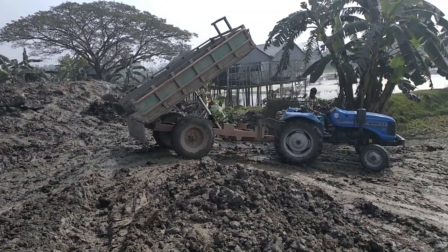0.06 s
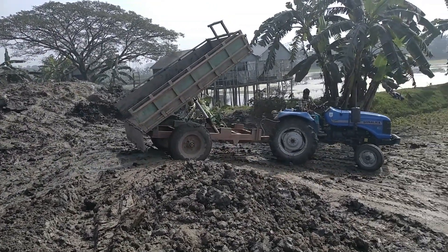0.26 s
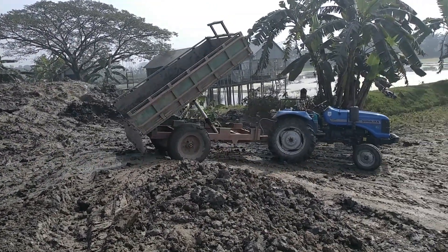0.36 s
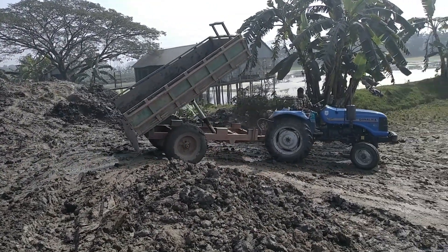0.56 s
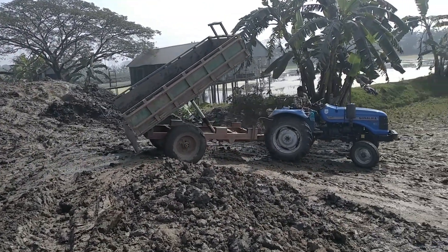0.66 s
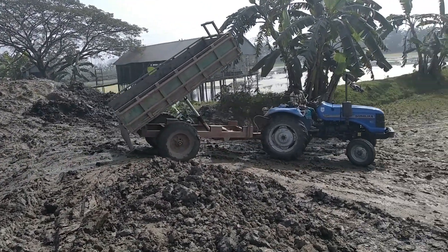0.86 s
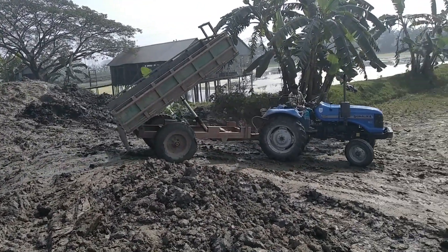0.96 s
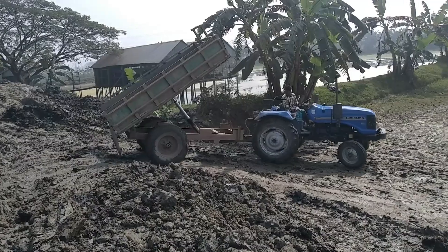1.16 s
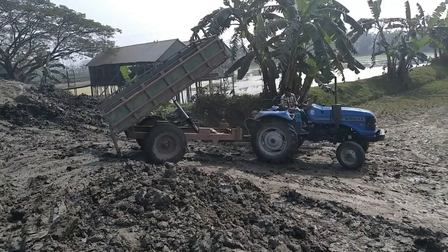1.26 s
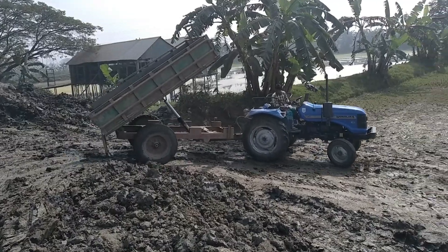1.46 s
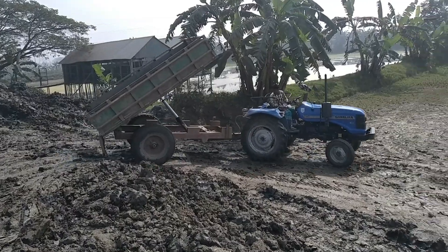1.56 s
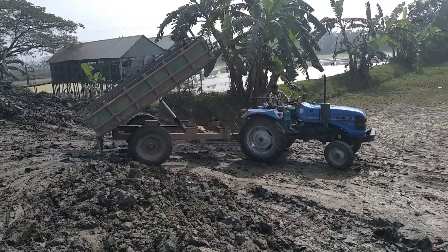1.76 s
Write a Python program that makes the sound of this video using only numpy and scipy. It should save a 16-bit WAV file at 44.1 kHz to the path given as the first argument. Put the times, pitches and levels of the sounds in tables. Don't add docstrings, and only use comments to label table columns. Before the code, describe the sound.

A diesel tractor thuds unevenly as its empty raised steel trailer scrapes, clanks and booms over ruts

```python
import sys
import numpy as np
from scipy import signal
from scipy.fft import rfft, irfft, next_fast_len
from scipy.io import wavfile
from scipy.ndimage import uniform_filter1d

SR = 44100
rng = np.random.default_rng(int(sys.argv[2]) if len(sys.argv) > 2 else 0)


def inscribe(sig):
    pcm = np.round(np.clip(np.atleast_2d(sig).T, -1, 1) * 32767)
    wavfile.write(sys.argv[1], SR, pcm.astype(np.int16))


def makeup_ratio(level_db):
    decades = np.asarray(level_db, float) / 20
    return 10 ** decades


N = 79380
T = np.arange(N) / SR


def unit(x):
    return x / np.sqrt(np.mean(x ** 2) + 1e-20)


def along(points, hz, axis=1):
    columns = np.transpose(points)
    return np.interp(np.log(hz + 1), np.log(columns[0] + 1), columns[axis])


def curves(rows):
    start_s, *columns = np.transpose(rows)
    return [np.interp(T, start_s, column) for column in columns]


def filtered(x, response):
    size = next_fast_len(N + SR // 2)
    spectrum = rfft(x, size) * response(np.fft.rfftfreq(size, 1 / SR))
    return irfft(spectrum, size)[..., :N]


def coloured_noise(colour):
    return unit(filtered(rng.standard_normal(N), lambda f: makeup_ratio(along(colour, f))))


def body(peaks):
    def response(f):
        total = 0
        for k, (pitch, width, db) in enumerate(peaks):
            damping = 1j * f * width
            total = total + (-1) ** k * makeup_ratio(db) * damping / (pitch * pitch - f * f + damping)
        return total
    return response


def grains(per_s, spread_db):
    hit = rng.random(N) < per_s / SR
    sign = np.sign(rng.standard_normal(N))
    return unit(hit * sign * makeup_ratio(spread_db * rng.standard_normal(N).clip(-2, 2)))


def shape(s, rise, hold, t60):
    fall_time = np.clip(T - s - rise - hold, 0, 1)
    return np.clip((T - s) / rise, 0, 1) ** 2 * makeup_ratio(-60 * fall_time / t60)


# (pitch_hz, fade_by_60_db_s, level_db)
YARD_ECHO = [(99, 0.22, -18.5), (635, 0.051, -10), (3130, 0.031, -1), (9700, 0.019, -0.5)]


def yard(x):
    out, step = np.zeros((2, N + SR)), SR // 20
    for start in range(0, N, step):
        hz, t, z = signal.stft(rng.standard_normal((2, SR // 8)), SR, nperseg=256)
        fade_s = along(YARD_ECHO, hz)[:, None]
        tail = signal.istft(z * makeup_ratio(-60 * t / fade_s) / np.sqrt(fade_s), SR, nperseg=256)[1]
        wet = signal.fftconvolve(x[None, start:start + step], tail / np.linalg.norm(tail[0]), axes=1)
        out[:, start:start + wet.shape[1]] += wet
    return filtered(out[:, :N], lambda f: makeup_ratio(along(YARD_ECHO, f, axis=2)))


# (start_s, firings_per_s)
ENGINE_SPEED = [
    (0, 39.2),
    (.45, 35.3),
    (.65, 56.7),
    (1, 57),
    (1.35, 48),
    (1.8, 51.2),
]


def firings():
    jitter, scatter_db, pressure_s = .08, 1, .021
    turn = np.cumsum(curves(ENGINE_SPEED)[0]) / SR
    draw = rng.standard_normal((int(turn[-1]) + 1, 2))
    k = np.arange(len(draw))
    at = np.searchsorted(turn, k + jitter * draw[:, 0]).clip(0, N - 1)
    cylinder_db = np.take([0, -3, -1.5], k % 3)
    fire = np.bincount(at, makeup_ratio(cylinder_db + scatter_db * draw[:, 1]), N)
    pressure = unit(signal.lfilter([1], [1, -np.exp(-1 / (pressure_s * SR))], fire))
    return fire, pressure


# (pitch_hz, level_db)
CLATTER_COLOUR = [(180, -16), (300, 6), (411, -10.5), (571, -5.5), (1350, -11), (2170, -9.5), (2400, -12),
                  (7880, -17), (15500, -43)]


def clatter(pressure, swing_db):
    level_db, follows, pulsing = -44, 0.16, 0.22
    return makeup_ratio(level_db + follows * swing_db) * coloured_noise(CLATTER_COLOUR) * (1 + pulsing * (pressure - 1))


# (pitch_hz, width_hz, level_db)
EXHAUST_PIPE = [(114.7, 44, 2), (153, 26, 6.5), (210, 90, 0), (278, 140, -4.5), (525, 132, -5)]


def exhaust(fire, pressure, swing_db):
    level_db, follows, puff_share = -38, 0.24, .55
    gas = pressure * rng.standard_normal(N)
    pulse, puff = filtered(np.array([fire, gas]), body(EXHAUST_PIPE))
    mix = np.sqrt(1 - puff_share) * unit(pulse) + np.sqrt(puff_share) * unit(puff)
    return makeup_ratio(level_db + follows * swing_db) * mix


def engine(shake_db):
    swing_db = shake_db - shake_db.mean()
    fire, pressure = firings()
    return exhaust(fire, pressure, swing_db) + clatter(pressure, swing_db)


# (pitch_hz, width_hz, level_db)
BED_DEEP = [(109, 53, -5), (160, 35.5, 2), (220, 40, -1), (288, 12, -3.5)]
BED_SHEETS = [(266.4, 37, -2.5), (421, 39, -8), (477.4, 12.7, 1), (585, 133, -2.5), (639, 114, 0),
              (930, 190, -10), (1950, 720, -20.5)]
KNOCKS_PER_S, KNOCK_SPREAD_DB = 600, 3


def bed(shake_db, bright_db):
    low = unit(filtered(grains(KNOCKS_PER_S, KNOCK_SPREAD_DB), body(BED_DEEP)))
    high = unit(filtered(grains(2 * KNOCKS_PER_S, KNOCK_SPREAD_DB), body(BED_SHEETS)))
    return makeup_ratio(shake_db) * (low + makeup_ratio(bright_db) * high) / np.sqrt(1 + makeup_ratio(2 * bright_db))


# (start_s, level_db, pitch_hz)
JOLTS = [(0.239, -29.5, 210), (0.325, -40, 160), (0.486, -35, 135), (.512, -37, 150), (.555, -28, 195),
         (.578, -33, 165), (0.608, -25, 218), (0.637, -29, 160), (.662, -33, 170), (.711, -31, 160),
         (.865, -34, 190), (0.943, -25.5, 112), (1.138, -25, 167.8), (1.329, -22, 145.2), (1.398, -29, 210),
         (1.522, -29.5, 156.5), (1.638, -30.5, 143.5), (1.744, -38.5, 125.6)]


def thumps():
    rise_s, hold_s, t60_s, overtone, overtone_db = .007, .007, .05, 1.7, -5
    out = np.zeros(N)
    for s, db, hz in JOLTS:
        angle = 2 * np.pi * hz * (T - s)
        note = np.sin(angle) + makeup_ratio(overtone_db) * np.sin(overtone * angle)
        out += makeup_ratio(db) * shape(s, rise_s, hold_s, t60_s) * note
    return out


# (pitch_hz, width_hz, level_db)
TAILGATE_PANEL = [(282, 30, 0.5), (453, 27, 0.5), (567, 29, 1.5), (652, 42, -0.5), (800, 155, -11)]
# (start_s, level_db, hold_s)
TAILGATE_GROANS = [
    (0.399, -22.5, 0.045),
    (1.057, -40.5, 0.049),
    (1.433, -38.5, 0.071),
]


def tailgate():
    rise_s, t60_s = .015, .05
    judder = unit(filtered(grains(KNOCKS_PER_S, KNOCK_SPREAD_DB), body(TAILGATE_PANEL)))
    return judder * sum(makeup_ratio(db) * shape(s, rise_s, hold, t60_s) for s, db, hold in TAILGATE_GROANS)


def squeak():
    start_s, rise_s, hold_s, glide_s = .452, .006, .009, .011
    t60_s, tail_t60_s, tail_db = .03, .16, -8
    level_db, octave_db, roughness, left_lag = -16, -30, .22, 1.4
    pitch = np.interp(T, [start_s, start_s + glide_s], [5050, 5358])
    phase = 2 * np.pi * np.cumsum(pitch) / SR - [[left_lag], [0]]
    flutter = 1 + roughness * unit(uniform_filter1d(rng.standard_normal(N), size=60))
    swell = shape(start_s, rise_s, hold_s, t60_s)
    swell = swell + makeup_ratio(tail_db) * shape(start_s, rise_s, hold_s, tail_t60_s)
    tone = np.sin(phase) + makeup_ratio(octave_db) * np.sin(2 * phase)
    return makeup_ratio(level_db) * swell * flutter * tone


# (start_s, level_db, ringing_pitch_hz, hold_s, ringing_over_broad_db)
STEEL_SCRAPES = [(0.11, -40, 1580, 0.063, 3), (0.228, -31, 5500, 0.0045, -2),
                 (0.238, -29, 6300, 0.002, 0.5), (0.344, -22.5, 6700, 0.034, -6),
                 (0.331, -29, 3580, 0.027, -23), (0.384, -37, 6760, 0.055, -3),
                 (0.484, -37, 4900, 0.047, -4), (0.561, -35.5, 6600, 0.038, -10),
                 (0.64, -44, 4100, 0.016, 1), (0.809, -38.5, 2560, 0.008, 2),
                 (0.85, -27.5, 4350, 0.0044, 6), (0.844, -25, 2120, 0.038, 7.5),
                 (0.887, -30.5, 4100, 0.021, -15), (0.916, -24.5, 2220, 0.016, 6.5),
                 (0.959, -27.5, 6140, 0.015, -19), (1, -27.5, 4070, 0.0084, -17),
                 (1.007, -24, 5850, 0.004, -1), (1.024, -26, 6260, 0.032, 3),
                 (1.285, -44, 6460, 0.0075, 45), (1.331, -52, 5970, 0.011, 23),
                 (1.357, -40.5, 7550, 0.0035, 3), (1.401, -35.5, 4430, 0.013, -27),
                 (1.43, -30.5, 4770, 0.023, -12), (1.489, -40, 4470, 0.028, -47),
                 (1.497, -49, 5430, 0.0067, 57)]
# (pitch_hz, level_db)
STEEL_COLOUR = [(530, -29), (900, 0.5), (1540, -7.5), (3460, 2), (5180, -1), (6820, -0.5), (9980, -11.5),
                (12800, -20.5), (15500, -54)]


def scrapes():
    contacts_per_s, spread_db, ring_width_hz = 5000, 1.5, 1650
    rise_s, t60_s, edge_t60_s, edge_hz, edge_db = .007, .14, .06, 8200, -0.5
    out = np.zeros(N)
    for s, db, hz, hold, ring_db in STEEL_SCRAPES:
        grit = grains(contacts_per_s, spread_db)
        ring = unit(filtered(grit, lambda f: body([(hz, ring_width_hz, 0)])(f) ** 2))
        broad = unit(filtered(grit, lambda f: makeup_ratio(along(STEEL_COLOUR, f))))
        bright = filtered(broad, lambda f: 1 / (1 + (edge_hz / (f + 1)) ** 8))
        slow = shape(s, rise_s, hold, t60_s) * (broad - bright + makeup_ratio(ring_db) * ring)
        fast = shape(s, rise_s / 2, hold, edge_t60_s) * makeup_ratio(edge_db) * bright
        out += makeup_ratio(db) * (slow + fast) / np.sqrt(1 + makeup_ratio(2 * ring_db))
    return out


# (start_s, level_db, pitch_hz, fade_by_60_db_s, crack_over_ring_db)
STRUCK_PINS = [(0.2321, -35.5, 5260, .03, 2), (0.2463, -24.5, 6540, 0.067, -13.5),
               (.3455, -27, 3670, .04, -1), (.352, -23, 6740, 0.039, 2), (0.8638, -22.5, 4410, 0.042, -11),
               (.930, -28, 2260, 0.049, -23), (0.9652, -24.5, 6100, 0.027, -3),
               (1.0227, -13, 6540, 0.049, -12), (1.035, -20.5, 6580, 0.098, -5),
               (1.056, -27, 6740, .07, -5.5), (1.3685, -30, 7670, 0.021, -3.5),
               (1.4042, -35.5, 4530, 0.019, -4), (1.4405, -22.5, 4480, .05, -8.5)]
# (pitch_hz, level_db)
CRACK_COLOUR = [(1500, -22), (3500, 0.5), (8000, 0), (12500, -7), (15300, -15)]


def pins():
    second_note, crack_db, crack_t60_s = 0.96, -2.1, 0.073
    out = np.zeros(N)
    for s, db, hz, t60, snap_db in STRUCK_PINS:
        angle = 2 * np.pi * hz * (T - s)
        pair = np.sin(angle) + 0.5 * np.sin(second_note * angle)
        ring = shape(s, 20 / SR, 0, t60) * pair
        crack = shape(s, 1 / SR, 0, crack_t60_s) * coloured_noise(CRACK_COLOUR)
        out += makeup_ratio(db) * (ring + makeup_ratio(crack_db + snap_db) * crack)
    return out


# (start_s, level_db, brightness_db)
TRAILER_SHAKE = [(0, -35.5, 2), (.11, -48.5, 2), (.32, -38.5, 2), (.385, -29, 10), (.462, -26.5, 6),
                 (.478, -40, -2), (.5, -27, -3.5), (.615, -26.5, 2), (.69, -32.5, -22), (.77, -62, 2),
                 (.85, -47.5, 72), (.868, -25, 0.5), (1.015, -31.5, 3), (1.17, -39, -4), (1.31, -46.5, 1),
                 (1.405, -34, -9.5), (1.545, -44, -1), (1.59, -58, 2)]


def scene():
    engine_left_db, engine_lead_s, squeak_yard_db = 9, 0.00026, -11
    half = np.array([[.5], [-.5]])
    shake_db, bright_db = curves(TRAILER_SHAKE)
    motor = engine(shake_db)
    trailer = bed(shake_db, bright_db) + thumps() + tailgate() + scrapes() + pins()
    dry_pin = squeak()
    lead = lambda f: np.exp(2j * np.pi * f * half * engine_lead_s)
    ahead = filtered(motor, lambda f: makeup_ratio(half * engine_left_db) * lead(f))
    direct = ahead + trailer + dry_pin
    return direct * makeup_ratio(-4.0) + yard(motor + trailer + makeup_ratio(squeak_yard_db) * dry_pin[1])


TREBLE_HZ = 8050


def thinned(x):
    frame, neighbours = 1536, 40
    hz, _, z = signal.stft(x, SR, nperseg=frame)
    weak = np.abs(z) < uniform_filter1d(np.abs(z), size=neighbours, axis=1)
    weak = weak & (hz > TREBLE_HZ)[:, None]
    return signal.istft(z * ~weak, SR, nperseg=frame)[1][:, :N]


def treble_gate(x):
    opens_db, shut_db, window_s, steepness = -48.5, -50, .012, 4
    top = filtered(x, lambda f: f > TREBLE_HZ)
    loud = np.abs(uniform_filter1d(top ** 2, size=int(window_s * SR))) / makeup_ratio(2 * opens_db)
    gate = makeup_ratio(shut_db) + 1 / (1 + (loud + 1e-9) ** -steepness)
    return x - top + gate * top


# (pitch_hz, level_db)
MIC_COLOUR = [(25, -15), (60, -3.5), (100, 1), (2500, 2), (3050, -2.5), (3700, 1.5), (14600, 1),
              (15500, -33)]
# (pitch_hz, left_minus_right_db)
LEFT_OVER_RIGHT = [(100, -5.7), (400, -2), (1000, -2.5), (2400, -6), (5000, 1), (7800, 6), (8800, 13),
                   (15000, 11)]
# (pitch_hz, left_lead_radians)
LEFT_LEAD = [(90, -.15), (250, -.55), (500, -1.3), (900, -2.6), (1640, -3.7), (3500, -3.1), (6500, -4.4),
             (9000, -8.5)]


def microphones(x):
    side = np.array([[.5], [-.5]])

    def port(f):
        balance_db = along(LEFT_OVER_RIGHT, f)
        level_db = along(MIC_COLOUR, f) + side * balance_db - np.abs(balance_db) / 2
        return makeup_ratio(level_db) * np.exp(1j * side * along(LEFT_LEAD, f))
    return filtered(x, port)


def top_cut(x):
    return signal.sosfilt(signal.butter(12, 15770, fs=SR, output="sos"), x)


def record(dry):
    left, right = microphones(dry)
    ports = thinned(np.array([left, treble_gate(right)]))
    return top_cut(makeup_ratio(4.5) * ports)


dry = scene()
out = record(dry)
inscribe(out)
```